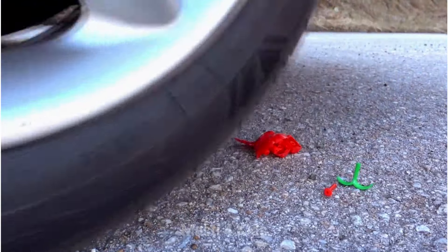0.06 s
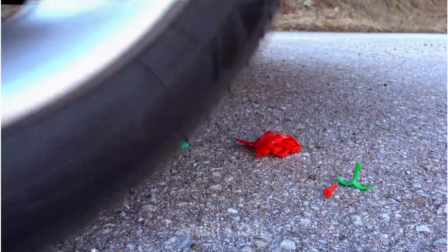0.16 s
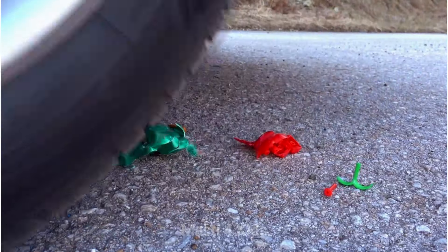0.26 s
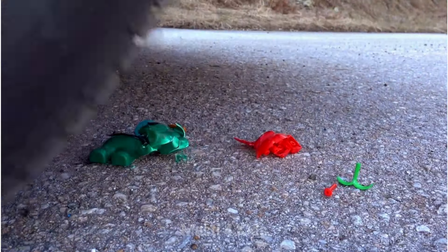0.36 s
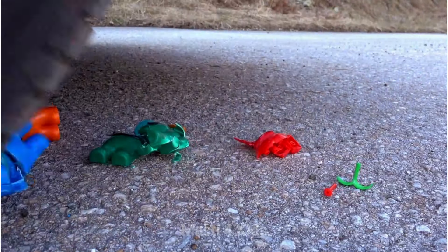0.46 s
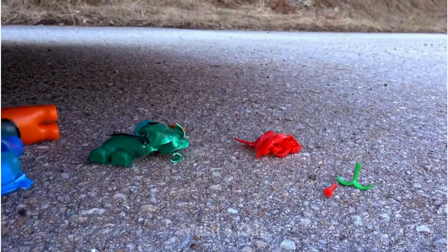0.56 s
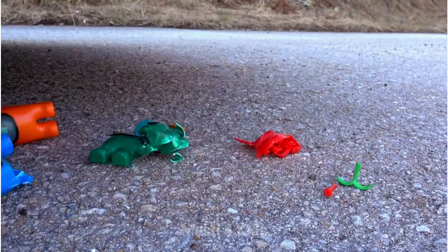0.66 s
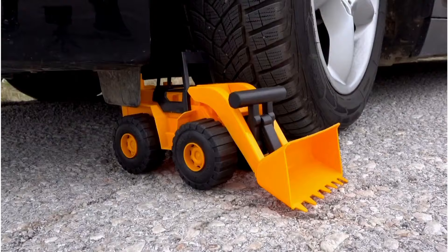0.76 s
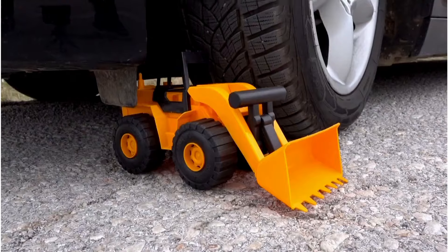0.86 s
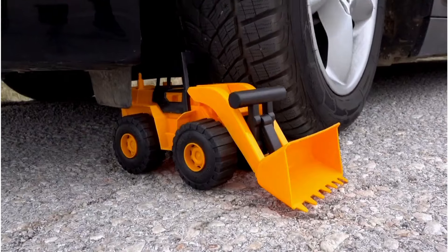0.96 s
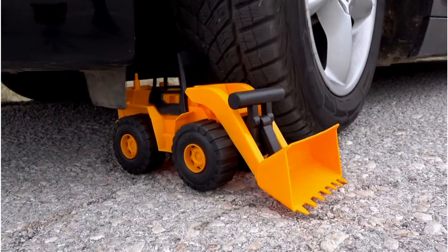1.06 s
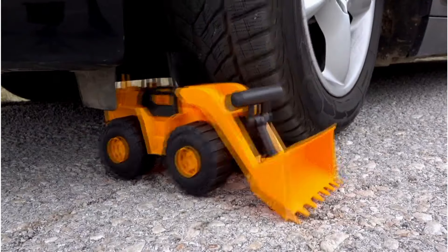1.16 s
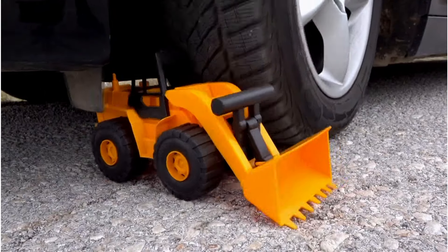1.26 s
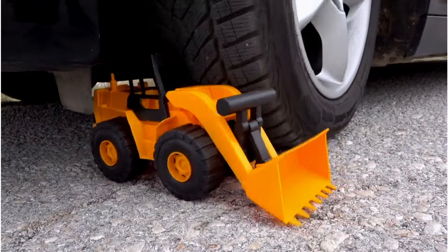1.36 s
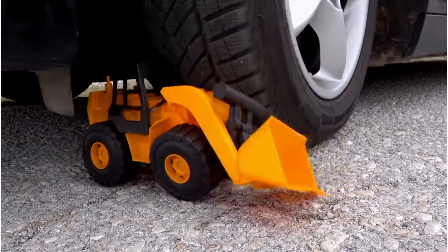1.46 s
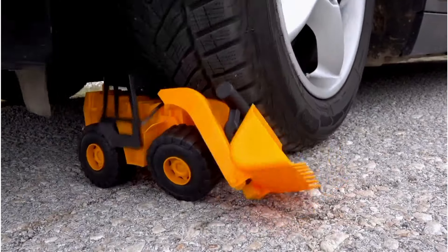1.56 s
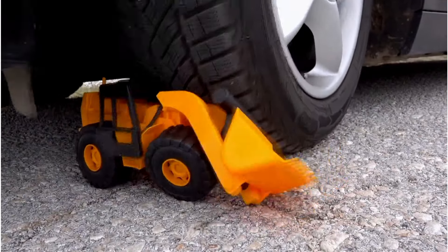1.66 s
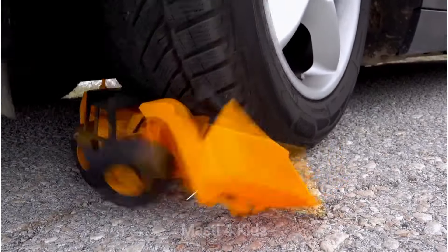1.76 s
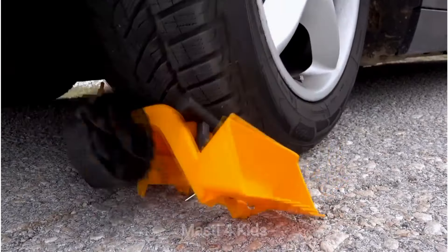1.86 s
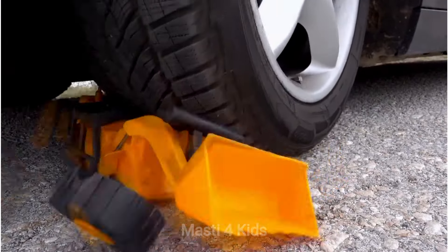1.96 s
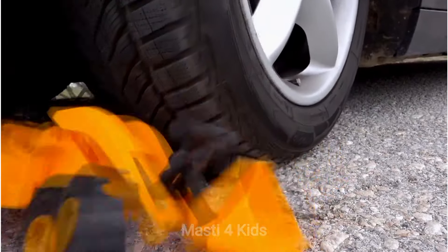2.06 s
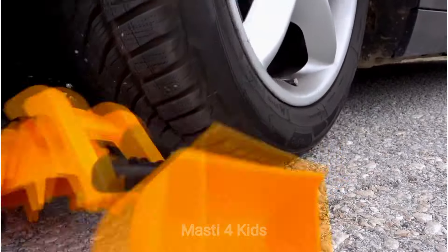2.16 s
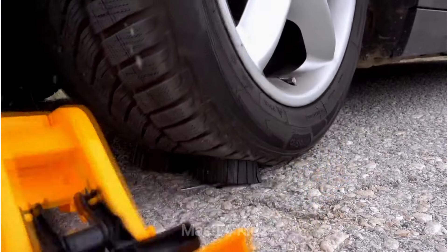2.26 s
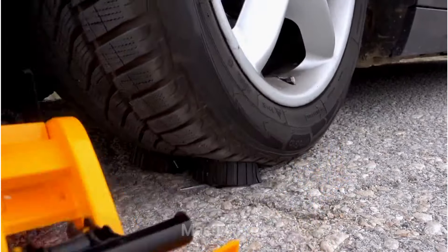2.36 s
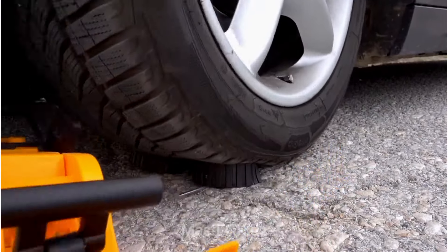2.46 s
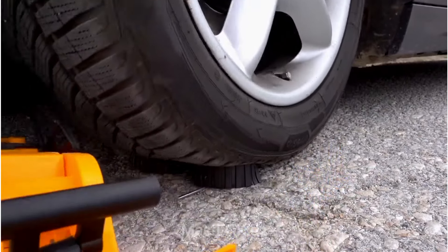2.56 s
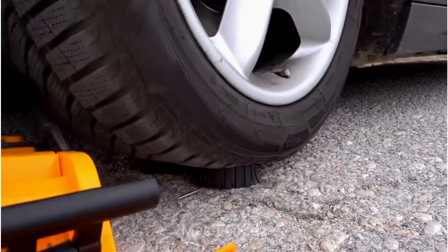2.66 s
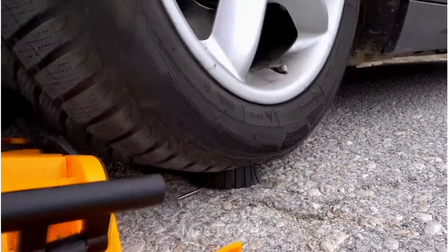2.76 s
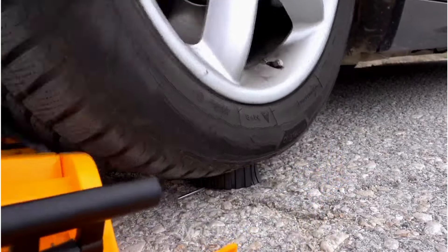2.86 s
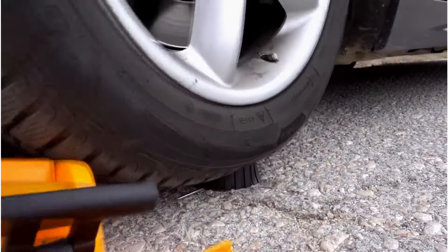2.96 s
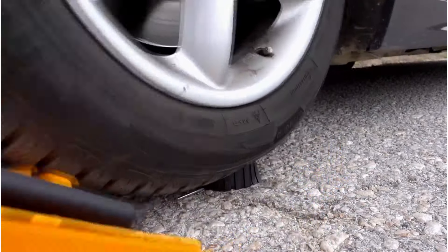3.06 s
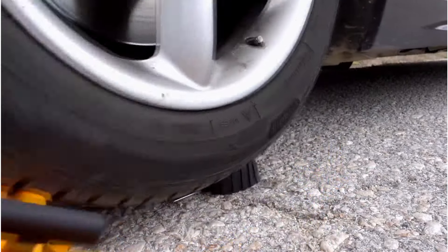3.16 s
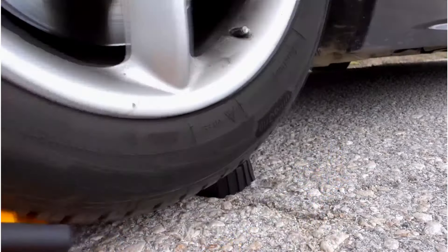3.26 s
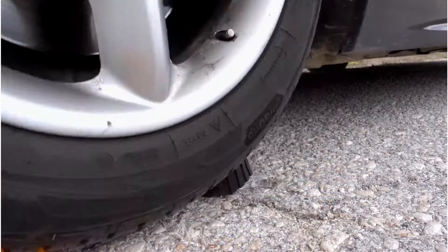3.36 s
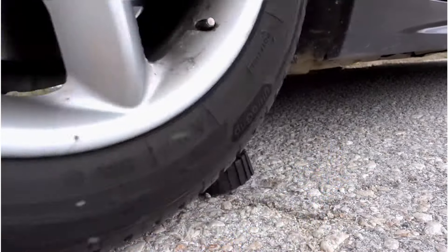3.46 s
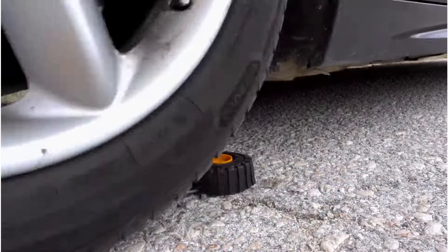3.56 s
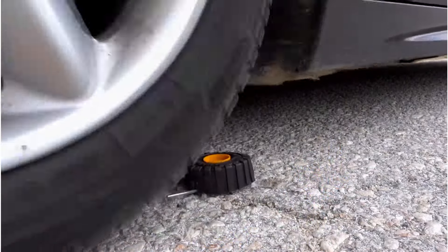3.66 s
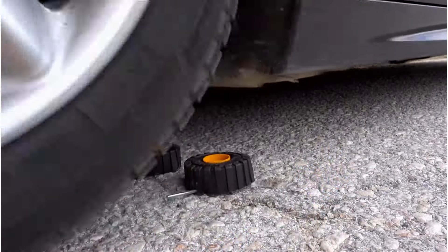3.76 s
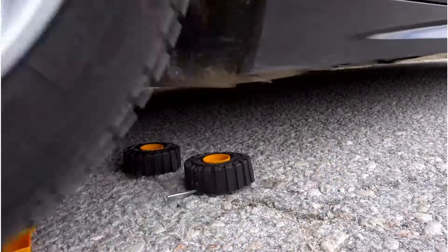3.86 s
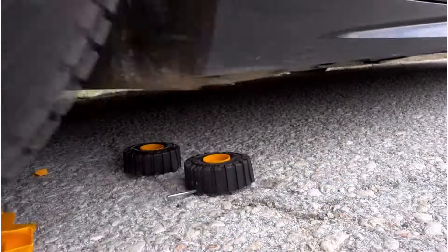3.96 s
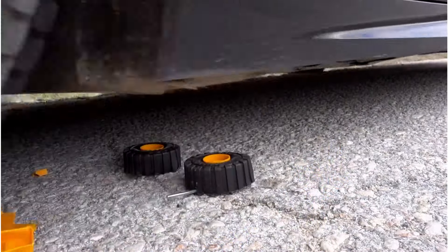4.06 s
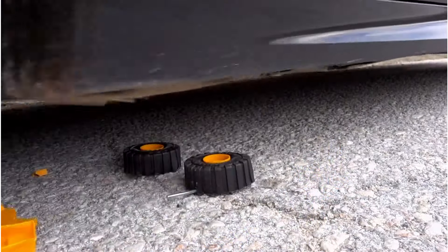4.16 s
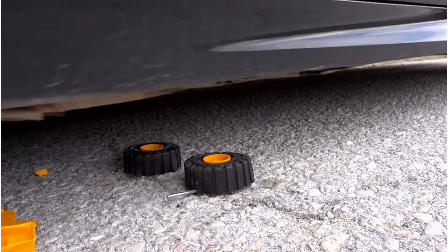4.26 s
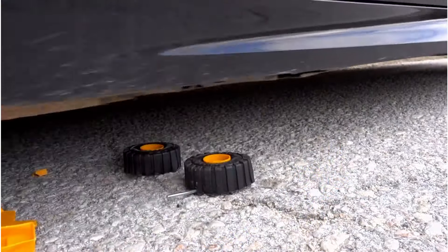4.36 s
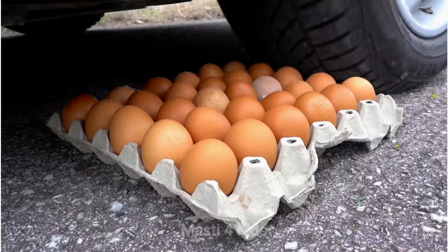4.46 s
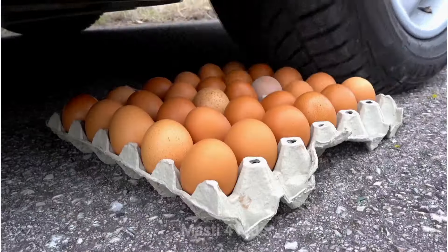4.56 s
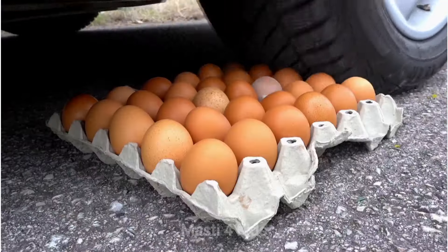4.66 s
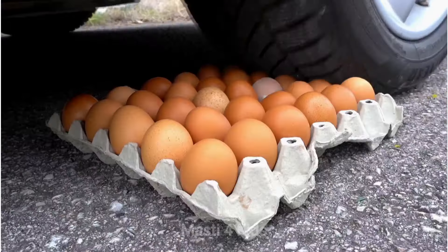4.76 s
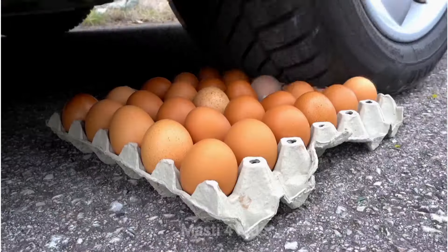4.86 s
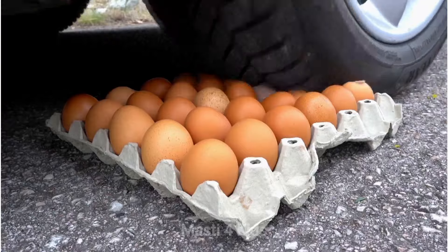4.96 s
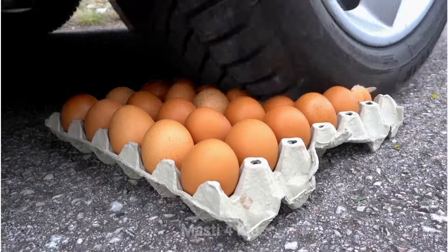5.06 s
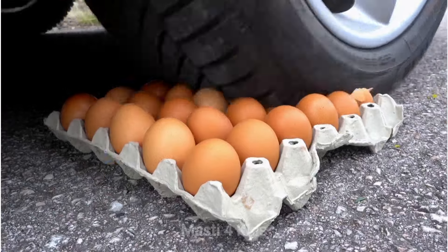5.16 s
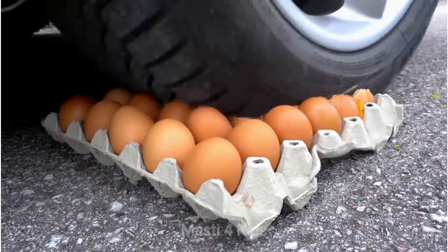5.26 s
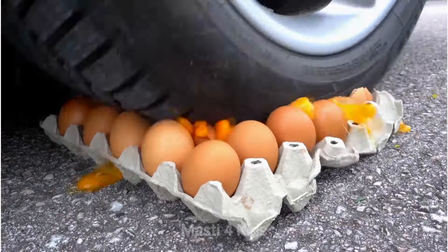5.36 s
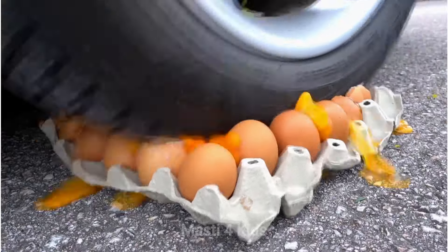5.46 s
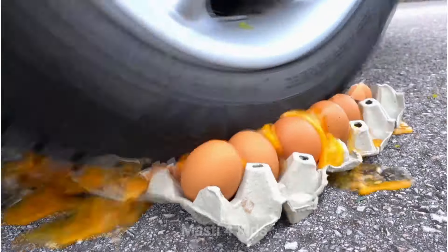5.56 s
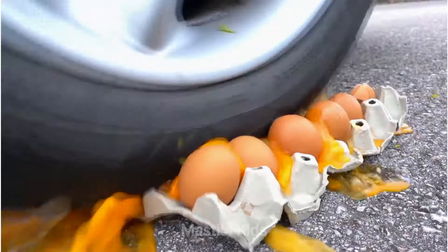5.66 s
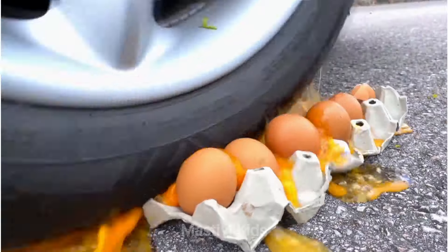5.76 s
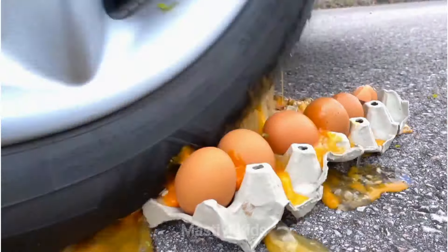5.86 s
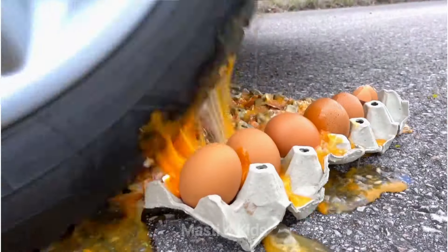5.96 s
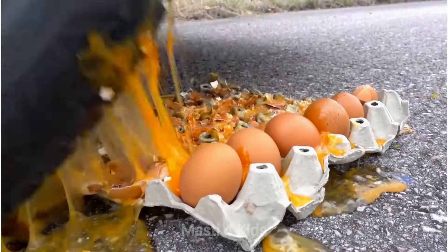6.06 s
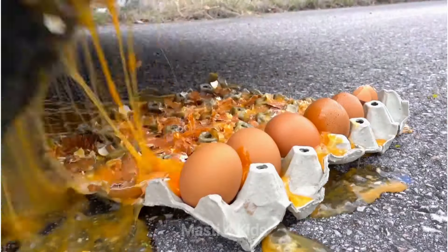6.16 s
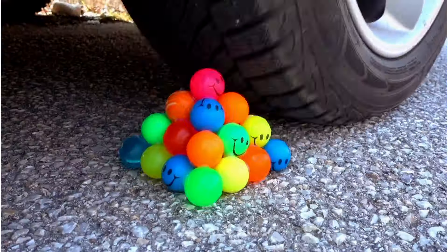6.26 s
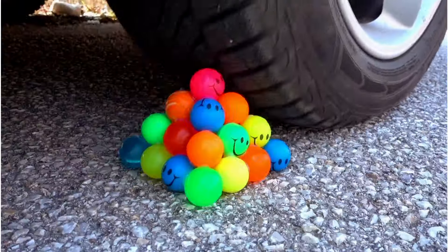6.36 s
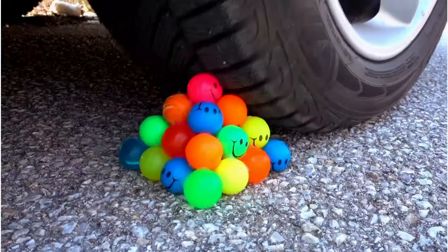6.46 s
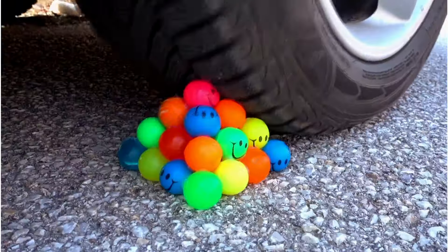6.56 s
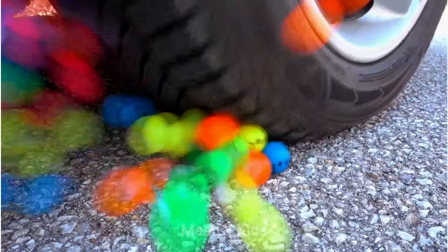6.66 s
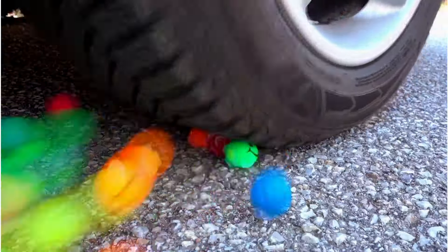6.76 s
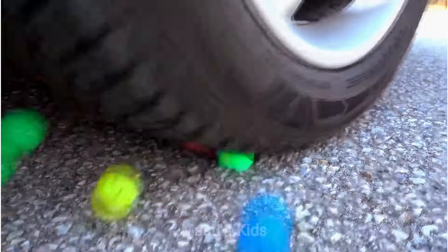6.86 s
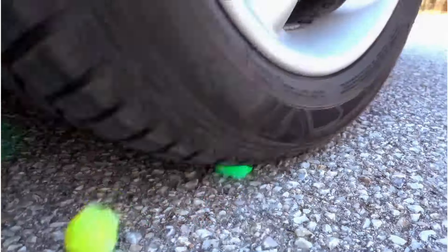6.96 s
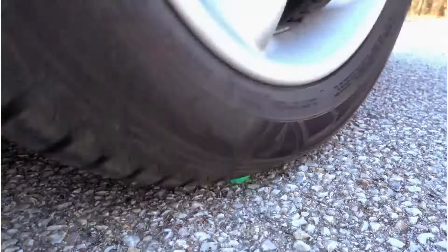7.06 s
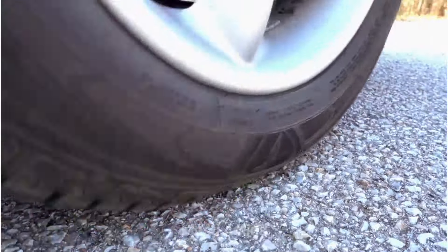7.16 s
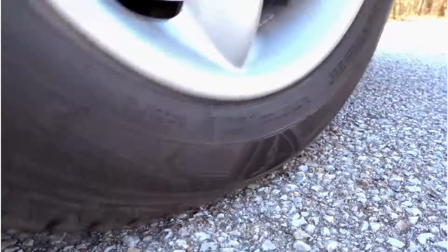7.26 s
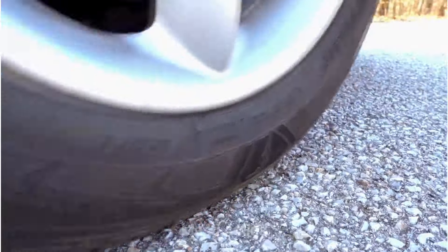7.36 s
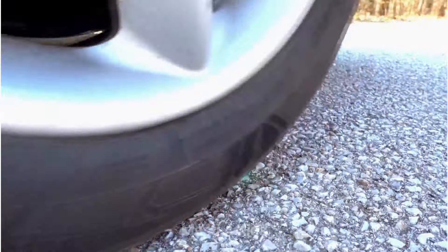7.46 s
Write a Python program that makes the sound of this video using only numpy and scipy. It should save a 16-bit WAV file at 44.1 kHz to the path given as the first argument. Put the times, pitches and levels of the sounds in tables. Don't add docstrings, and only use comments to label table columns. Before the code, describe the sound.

Outdoors on asphalt, stereo microphones sit very close beside a slowly rolling car tyre, dry, with faint deep air noise. At 0 s a short hollow creak and plastic crunch gives way to sharp ticks and small cracks, almost quiet by 0.9 s with a tiny clink. From 1.2 s a hard plastic toy scrapes and gives way; the loudest knock comes near 1.95 s with a low tyre thud, followed by dense snapping until 2.4 s. Between 2.45 and 3.0 s dull, rapid stick-slip creaks around a mid pitch dominate. Crunching and snapping return from 3.1 to 4.0 s over ground rumble and tyre hum. Sparse debris ticks lead into a lull until 4.85 s. Eggs crunch from 5.0 to 5.9 s with many short hollow pops and fine crackle, then drips and ticks. At 6.8-7.3 s, small balls thud, knock and crack, then it thins out.

```python
import sys
import numpy as np
from scipy import signal
from scipy.fft import rfft, irfft, next_fast_len
from scipy.io import wavfile
from scipy.ndimage import uniform_filter1d

SR = 44100
rng = np.random.default_rng(int(sys.argv[2]) if len(sys.argv) > 2 else 0)


def digitize_waveform(pressure):
    field = np.atleast_2d(pressure).T
    bounded = np.clip(field, -1, 1)
    quanta = np.round(bounded * 32767).astype(np.int16)
    wavfile.write(sys.argv[1], SR, quanta)


def level_to_linear(level):
    exponent = np.asarray(level, float) / 20
    return 10 ** exponent


N = 330750


def evened(x):
    return x / np.sqrt(np.mean(x ** 2) + 1e-20)


def read(points, hz):
    f, value = np.transpose(points)
    return np.interp(np.log(hz + 1), np.log(f + 1), value)


def curves(rows):
    s, *columns = np.transpose(rows)
    return [np.interp(np.arange(N) / SR, s, c) for c in columns]


def add(mix, s, sound):
    part = mix[max(round(s * SR), 0):][:len(sound)]
    part += sound[:len(part)]


def decay(t, t60):
    return level_to_linear(-60 * t / t60)


def onset(t, rise_s):
    return 1 - np.exp(-t / rise_s)


def sine(hz, t):
    return np.sin(2 * np.pi * hz * t)


def colour(x, gain):
    size = next_fast_len(len(x))
    return irfft(rfft(x, size) * gain(np.fft.rfftfreq(size, 1 / SR)), size)[:len(x)]


def ring(x, hz, width):
    r = np.exp(-np.pi * width / SR)
    return signal.lfilter([1 - r], [1, -2 * r * np.cos(2 * np.pi * hz / SR), r * r], x)


def clicks(per_s, spread_db):
    chance = rng.random(N)
    size = np.minimum(rng.exponential(1, N), 4)
    return level_to_linear(spread_db * size) * (chance < per_s / SR) * rng.choice([-1., 1.], N)


def clumps(per_s, spread_db, fade_s, rest):
    fade = np.exp(-1 / (fade_s * SR))
    bursts = signal.lfilter([1], [1, -fade], abs(clicks(per_s, spread_db)))
    return evened(rest + evened(bursts))


def patchy(x, depth_db):
    z = signal.stft(x, nperseg=384)[2]
    field = uniform_filter1d(rng.standard_normal(z.shape), size=2, axis=0)
    field = uniform_filter1d(field, size=3, axis=1)
    return evened(signal.istft(z * level_to_linear(depth_db * evened(field)), nperseg=384)[1][:N])


def swells(rows, rise_s, sag_db):
    out = np.zeros(N)
    for s, db, length in rows:
        u = np.arange(0, 2 * abs(length), 1 / SR)
        stop = min(abs(length) / 2, 0.12)
        ending = np.maximum(u - length + stop, 0) / stop
        add(out, s, level_to_linear(db - sag_db * u / length) * np.exp(-ending ** 2) * onset(u, rise_s))
    return out


# t/s, grinding level/dB, splinters above that/dB
LOAD = [(0, -40, -7), (.2, -62, 4), (.48, -69, -9), (.63, -64.5, 5.5), (.93, -67.5, -1.5), (1.2, -67, -7),
        (1.9, -40, -11), (2.8, -52.5, -28), (3.1, -42.5, -15.5), (3.9, -51.5, 0.5), (4.18, -50.5, -3.5),
        (4.85, -69, -8), (5.1, -35, -5.5), (5.78, -43.5, 3), (6.07, -50, -15), (6.72, -60.5, -5),
        (7.15, -64, -1), (7.5, -47, -10)]
# start t/s, grinding level/dB, length/s, splinters above that/dB
COLLAPSES = [(0, -43, 0.017, 10), (0.504, -54, 0.11, -2.5), (1.157, -49.5, 0.18, -15.5),
             (1.297, -32, 0.12, -20.5), (1.406, -40, 0.14, -36), (1.55, -33, 0.081, -14),
             (1.627, -43, 0.054, -14), (1.942, -34, 0.18, -22.5), (2.095, -32, 0.063, -12),
             (2.175, -32.5, 0.17, -8.5), (2.389, -39, 0.17, -14), (2.617, -37, 0.13, -38),
             (3.125, -40.5, 0.27, -13.5), (3.203, -39.5, 0.068, -1.5), (3.323, -29, 0.15, -12.5),
             (3.497, -33.5, 0.15, -12), (3.68, -34.5, 0.21, -10.5), (4.099, -50, 0.038, -8),
             (4.54, -66, 0.17, -43.5), (4.865, -51.5, 0.19, -6), (5.017, -33, 0.058, -9),
             (5.445, -35, 0.35, -5.5), (5.858, -40, 0.19, -10), (6.217, -54, 0.2, -14),
             (6.513, -46, 0.14, -38), (6.779, -46.5, 0.22, -3.5), (7.012, -38.5, 0.061, -21),
             (7.194, -42, 0.17, -6.5)]
GIVE_S, GIVE_SAG_DB = 0.0085, 2


def pressure():
    level_db, brittle_db = curves(LOAD)
    grinds = [(s, db, length) for s, db, length, up_db in COLLAPSES]
    splinters = [(s, db + up_db, length) for s, db, length, up_db in COLLAPSES]
    grind = np.hypot(level_to_linear(level_db), swells(grinds, GIVE_S, GIVE_SAG_DB))
    brittle = np.hypot(level_to_linear(level_db + brittle_db), swells(splinters, GIVE_S, GIVE_SAG_DB))
    return grind, brittle


# start t/s, level/dB, length/s
SQUASH = [
    (5.03, 0, .85),
]


def eggs_underfoot():
    return swells(SQUASH, GIVE_S, 0)


# f/Hz, density/dB
AIR = [(18, -35), (30, 11), (90, 1), (13900, -52), (15800, -50)]


def outdoor_air():
    return level_to_linear(-71.5) * evened(colour(rng.standard_normal(N), lambda hz: level_to_linear(read(AIR, hz))))


# start t/s, level/dB, length/s
RUMBLE = [(0, -49, 0.43), (.9, -43.5, 0.2), (1.25, -46, 0.66), (3.3, -40.5, 0.44), (3.68, -33.5, 0.19),
          (4.65, -44.5, 0.39), (4.95, -42, 1.59), (6.79, -43, 0.34)]


def ground_rumble():
    rumble = evened(ring(ring(rng.standard_normal(N), 119.0, 34), 62, 72))
    return (level_to_linear(-104) + swells(RUMBLE, 0.013, -1.5)) * level_to_linear(-11.0) * rumble


RING_HZ = 204.2
# start t/s, level/dB, length/s
TYRE = [(0, -50, 0.1), (1.55, -48.5, 0.23), (1.98, -37, 0.096), (2.2, -44, 0.15), (2.7, -51, 0.24),
        (3.32, -47, 0.7), (3.8, -49.5, 0.39), (4.05, -61, 0.29), (5.02, -39, 0.071), (5.17, -39.5, 0.21),
        (5.4, -46.5, 0.35), (6.82, -37.5, 0.16), (7.13, -52.5, 0.28)]
# start t/s, level/dB, length/s
OVERTONES = [(3.3, -57, 0.27), (3.79, -49.5, 0.2), (4.09, -56, 0.086)]


def air_ring():
    shake = rng.standard_normal((2, N))
    free = evened(ring(shake[0], RING_HZ, 4.5))
    rough = evened(ring(ring(shake[1], 235, 80), 194, 81))
    damped = np.clip((20 * np.log10(pressure()[0]) + 54) / 14, .15, .9)
    hum = (1 - damped) * free + damped * rough
    upper = sum(evened(ring(shake[0], k * RING_HZ, 7.0)) for k in (2, 2.92))
    return (level_to_linear(-74.5) + swells(TYRE, 0.013, 1)) * hum + swells(OVERTONES, 0.013, 3.7) * upper


# t/s, peak level/dB, f/Hz
THUMPS = [(1.577, -36.5, 452), (2.016, -22.5, 199), (2.037, -25, 221), (2.236, -39, 214), (3.805, -39, 204),
          (3.812, -30.5, 114), (3.852, -39, 131), (5.063, -30, 172), (6.854, -26, 253), (6.901, -30, 172.5),
          (7.09, -35.5, 191), (7.136, -27.5, 212.3)]


def thumps():
    out, t = np.zeros(N), np.arange(9000) / SR
    for s, db, hz in THUMPS:
        thud = decay(t, 0.13) * sine(hz, t + 0.002 * onset(t, 0.0018))
        upper_body = 0.26 * decay(t, 0.12) * sine(1.91 * hz, t)
        thud = (thud + upper_body) * onset(t, 0.00088)
        add(out, s, level_to_linear(db + 0.5) * (thud + 0.45 * decay(t, 0.081) * sine(RING_HZ, t)))
    return out


# t/s, peak level/dB, f/Hz
TICKS = [(0.181, -18.5, 3330), (0.546, -27, 860), (.709, -39, 4350), (0.754, -27.5, 2400),
         (.867, -37, 2130), (1.25, -18, 2060), (4.237, -35, 1510), (4.245, -36, 1400), (4.303, -21, 2210),
         (4.385, -28, 1700), (4.546, -32.5, 1110), (4.715, -32.5, 1040), (6.062, -31, 2070),
         (6.24, -31.5, 1110), (6.34, -39, 874), (6.522, -29.5, 2720), (6.582, -28.5, 1200),
         (6.608, -27.5, 1120), (6.658, -29, 1900), (7.383, -50, 1000)]


def debris():
    out, t = np.zeros(N), np.arange(1500) / SR
    for s, db, hz in TICKS:
        hit = rng.standard_normal(len(t)) * decay(t, 0.03) + 6.0 * (t == 0)
        sound = evened(ring(hit, hz, 63)) + 0.73 * evened(ring(hit, 2850, 1040)) + 0.095 * evened(hit)
        add(out, s, level_to_linear(db - 12.0) * sound / abs(sound).max())
    return out


# t/s, peak level/dB, f/Hz
CHIPS = [(0.547, -28.5, 890), (1.884, -17, 1830), (3.87, -22.5, 714), (4.236, -33, 1950),
         (4.246, -33.5, 875), (4.383, -29, 1600), (5.893, -21.5, 940), (5.923, -24, 840), (5.933, -22, 890),
         (5.957, -20, 982), (6.523, -34, 765), (6.609, -34, 756), (6.661, -37, 1860), (7.095, -32.5, 1620)]


def chips():
    out, t = np.zeros(N), np.arange(400) / SR
    for s, db, hz in CHIPS:
        u = t * hz / 0.25
        add(out, s, level_to_linear(db - 2.5) * u * np.exp(1 - u) * sine(hz, t))
    return out


# t/s, peak level/dB
SPARKS = [(.851, -50), (3.658, -31), (4.326, -38), (5.255, -44), (5.409, -33), (5.446, -38), (5.66, -46),
          (6.825, -28.5), (6.934, -35), (7.183, -49), (7.247, -29)]


def sparks():
    out, t = np.zeros(N), np.arange(500) / SR
    for s, db in SPARKS:
        add(out, s, level_to_linear(db - 1.5) * rng.standard_normal(len(t)) * decay(t, 0.028))
    small = signal.oaconvolve(abs(clicks(150, 5.2)), decay(t, 0.0035))[:N] * rng.standard_normal(N)
    crackle = level_to_linear(-14.0) * pressure()[1] * eggs_underfoot() * evened(small)
    return colour(out + crackle, lambda hz: np.clip(hz / 3000, 0, 1))


# t/s, peak level/dB, f/Hz
POPS = [(5.019, -33, 690), (5.173, -20.5, 685), (5.185, -29, 937), (5.192, -30, 1020), (5.206, -34, 710),
        (5.22, -24, 355), (5.229, -29, 805), (5.269, -31, 1360), (5.303, -28, 705), (5.315, -24.5, 565),
        (5.327, -23.5, 730), (5.357, -24, 345), (5.372, -25, 810), (5.397, -32, 610), (5.412, -28, 820),
        (5.425, -24, 640), (5.436, -29, 604), (5.445, -25, 760), (5.461, -25, 570), (5.478, -23, 650),
        (5.491, -27, 840), (5.559, -38, 1120), (5.572, -21, 810), (5.591, -32, 865), (5.634, -26.5, 420),
        (5.649, -34.5, 890), (5.696, -30, 867), (5.707, -34, 726), (5.718, -36, 1310), (5.74, -35, 1100),
        (5.763, -32, 870), (5.809, -30, 935), (6.008, -36, 985)]


def eggs():
    out, t = np.zeros(N), np.arange(900) / SR
    u = t / 0.0029
    swell = u * np.exp(1 - u - (u / 1.73) ** 2)
    for s, db, hz in POPS:
        add(out, s, level_to_linear(db - 2.5) * swell * sine(hz, t))
    return out


# t/s, peak level/dB
FRACTURES = [(0.009, -35), (0.154, -24), (0.235, -37), (0.36, -45), (0.589, -33), (1.3377, -33),
             (1.4235, -42), (1.439, -34), (1.6337, -39), (1.6636, -24), (1.861, -34), (1.8815, -30),
             (1.8933, -23), (2, -26), (2.1313, -25), (2.426, -42), (2.4503, -27), (2.6075, -39),
             (2.627, -40), (3.1923, -27), (3.362, -29), (3.4441, -22), (3.484, -36), (3.837, -26),
             (3.8705, -29), (3.951, -33), (3.9668, -24.5), (4.119, -38), (4.1945, -49), (4.226, -46),
             (4.341, -31), (4.364, -30.5), (4.4368, -50), (4.4637, -44), (5.06, -34), (5.0838, -38),
             (5.2018, -29), (5.3385, -28), (5.3647, -24), (5.3883, -32), (5.4948, -36), (5.6977, -38),
             (5.888, -36), (5.9229, -45), (5.931, -31), (6.226, -41), (6.3765, -47), (6.8164, -29),
             (6.8736, -31), (7.0239, -24.5), (7.052, -30), (7.209, -31), (7.29, -35)]


def fractures():
    out, t = np.zeros(N), np.arange(1500) / SR
    for s, db in FRACTURES:
        spray = rng.standard_normal(len(t)) * decay(t, 0.038) * onset(t, 0.00048)
        click = np.diff(spray, prepend=0)
        add(out, s, level_to_linear(db - 9.5) * (click * 0.42 + 1.78 * ring(spray, 4500, 3900)))
    return out


# t/s, peak level/dB
CLINKS = [(0.755, -45), (0.868, -55), (0.952, -45)]
# f/Hz, level/dB, t60/s
CLINK_MODES = [(870, -24, 0.11), (1480, -14.5, 0.2), (2130, -9, 0.11), (2400, -17, 0.071)]


def clinks():
    out, t = np.zeros(N), np.arange(6000) / SR
    for s, db in CLINKS:
        for hz, up_db, t60 in CLINK_MODES:
            add(out, s, level_to_linear(db + up_db) * decay(t, t60) * sine(hz, t))
    return out


# t/s, peak level/dB, f/Hz
SLIPS = [(.001, -22, 676), (.011, -29, 706), (.022, -21.5, 710), (.03, -21.5, 706), (.059, -31, 834),
         (2.468, -27, 1020), (2.49, -21, 1020), (2.517, -32, 654), (2.523, -26, 990), (2.533, -21.5, 995),
         (2.539, -22, 1003), (2.55, -24, 1030), (2.569, -27, 1050), (2.66, -19, 1047), (2.666, -19.5, 655),
         (2.677, -19, 824), (2.709, -20.5, 640), (2.717, -26, 920), (2.726, -19.5, 915), (2.783, -27, 990),
         (2.843, -29.5, 870), (2.85, -25, 1010), (2.857, -21, 977), (2.879, -29, 1000), (2.893, -25.5, 960),
         (2.907, -23, 990), (2.918, -30, 950), (2.946, -23, 930), (2.97, -22.5, 977), (2.986, -29, 1000)]
# t/s, peak level/dB, f/Hz
JERKS = [(2.645, -23.5, 1130), (2.65, -24, 1040), (2.755, -19, 986), (2.795, -20.5, 1015),
         (2.803, -24, 1060), (2.995, -29, 1030), (3.012, -24.5, 1054), (3.023, -29.5, 797)]
# start t/s (earlier times play from 0), peak level/dB,
# f/Hz, t60/s
PING = (-3.7, -37, 842, 0.48)


def creak():
    out, t = np.zeros(N), np.arange(2200) / SR
    for s, db, hz, up_db in [(*row, -18) for row in SLIPS] + [(*row, 11.5) for row in JERKS]:
        noise = rng.standard_normal(len(t))
        tone = sine(hz, t) + level_to_linear(up_db - 20.5) * sine(2080 * (1 + 0.029 * noise[0]), t)
        tone += .5 * decay(t, 0.019) * sine(0.9 * hz, t)
        tone += 0.056 * decay(t, 0.034) * sine(3.1 * hz, t)
        tone *= 1 + 0.83 * uniform_filter1d(noise, size=40)
        tone += 0.12 * ring(ring(noise, 1300, 2600), 3300, 1600) * decay(t, 0.041)
        add(out, s, level_to_linear(db - 3.0) * decay(t, 0.035) * onset(t, 0.00056) * tone)
    s, db, hz, t60 = PING
    t = np.arange(12000) / SR
    add(out, s, level_to_linear(db) * decay(t, t60) * onset(t, 0.0061) * sine(hz, t))
    return colour(out, lambda hz: 1 / np.sqrt(1 + (hz / 7500) ** 6))


# t/s, peak level/dB, f/Hz, length of the run of jolts/s
BLOWS = [(1.344, -17, 980, 0.048), (1.408, -15.5, 1476, 0.041), (2.309, -19, 1140, 0.049),
         (2.499, -24.5, 1010, 0.049), (3.326, -27, 1150, 0.078), (1.294, -27.5, 620, 0.019),
         (0.238, -25.5, 700, 0.016), (0.955, -43, 2100, 0.0046), (1.237, -31, 1480, 0.03),
          (1.482, -29, 1410, 0.011), (1.578, -20, 1330, 0.022), (1.66, -24, 2120, 0.013),
          (1.746, -22, 1390, 0.013), (1.778, -19, 584, 0.021), (1.884, -20.5, 1730, 0.038),
          (1.944, -10, 1650, 0.017), (2.014, -23, 556, 0.045), (2.106, -23, 1250, 0.028),
          (2.183, -18.5, 1200, 0.03), (2.378, -21.5, 1740, 0.021), (3.268, -17.5, 905, 0.023),
          (3.394, -21.5, 730, 0.029), (3.453, -22, 570, 0.018), (3.629, -21.5, 1760, 0.034),
          (3.669, -17, 755, 0.02), (3.866, -24.5, 675, 0.017), (3.963, -26.5, 1110, 0.019),
          (5.022, -24.5, 705, 0.0073), (5.178, -22.5, 704, 0.04), (5.569, -20.5, 864, 0.047),
          (6.797, -23, 470, 0.033), (6.847, -20, 497, 0.05), (6.896, -22, 444, 0.017),
          (7.204, -22, 402, 0.015), (7.286, -22.5, 910, 0.012),
         (1.03, -51.5, 350, 0.074), (1.12, -45, 300, 0.029), (1.213, -35.5, 450, 0.022),
         (1.216, -45, 1480, 0.007), (1.27, -34, 1480, 0.0082), (1.362, -25, 910, 0.025),
         (2.506, -21.5, 610, 0.051), (2.686, -26.5, 1050, 0.014), (2.822, -36, 1000, 0.0049),
         (2.858, -33, 2120, 0.0083), (2.885, -43, 2330, .012), (2.938, -32.5, 2190, 0.01),
         (3.008, -29.5, 2900, .012), (3.032, -24.5, 2350, 0.0084), (3.185, -27.5, 1150, 0.032),
         (3.35, -29, 1000, 0.018), (3.375, -29, 800, 0.0081), (3.484, -21.5, 530, 0.031),
         (3.55, -21, 696, 0.018), (3.933, -32, 1100, 0.011), (4.062, -38, 1650, 0.0084),
         (4.34, -41, 650, 0.01), (4.66, -50, 448, 0.081), (4.71, -45, 337, 0.042),
         (5.85, -28, 2400, 0.0047), (6.0, -39, 1070, 0.034), (6.055, -30.5, 2140, 0.063),
         (6.245, -38, 2400, 0.0077), (6.345, -37.5, 840, 0.012), (6.58, -44, 935, 0.019),
         (6.953, -26, 523, 0.021), (7.258, -25.5, 331, 0.0073)]
# t/s, peak level/dB, f/Hz
TAPS = [(4.091, -23, 690), (5.891, -26, 915), (5.922, -30, 840), (5.933, -30, 890), (5.956, -26, 1060),
        (5.975, -22, 1120), (7.314, -21.5, 660)]


def knocks():
    out, t = np.zeros(N), np.arange(4400) / SR
    for s, db, hz, length in BLOWS + [(*row, 0.0068) for row in TAPS]:
        chance, size = rng.random((2, len(t)))
        run_s = np.clip(length, .002, .07)
        jolts = (chance < .05) * (size - .5) * np.exp(-(t / run_s) ** 4) + 0.28 * (t == 0)
        body = ring(jolts, hz, 40 + 0.098 * hz + .5 / run_s)
        tick = ring(jolts, 1.58 * hz, 950)
        tick_share = 0.21 + 0.00042 / length
        add(out, s, level_to_linear(db - 6.0) * (body / abs(body).max() + tick_share * tick / abs(tick).max()))
    return out


# t/s, peak level/dB, length of the shower of splinters/s
CRACKS = [(2.181, -27, 0.096), (3.4815, -29, 0.14), (4.719, -59, 0.032), (4.9582, -36, 0.27),
          (5.081, -31, 0.083), (0.14, -37, 0.085), (1.571, -22, 0.027), (1.657, -27, 0.055),
          (1.88, -38, 0.065), (1.941, -26, 0.075), (2.077, -27, 0.038), (2.369, -23, 0.012),
          (3.154, -33, 0.045), (3.391, -25.5, 0.057), (3.67, -22.5, 0.055), (5.431, -31.5, 0.039),
          (6.7964, -30.5, 0.035), (6.89, -35, 0.066), (7.0212, -34, 0.065), (7.2, -30.5, 0.023),
          (7.24, -37, 0.021)]
# t/s, peak level/dB
SNAPS = [(0.096, -37.5), (0.181, -36), (0.533, -36), (0.744, -45), (1.171, -38.5), (1.32, -36),
         (1.779, -25.5), (1.804, -27), (2.137, -28.5), (2.481, -32), (2.564, -38.5), (2.75, -42),
         (3.058, -27.5), (3.2245, -28), (3.509, -28.5), (3.622, -31.5), (3.7699, -19.5), (3.8703, -24),
         (4.0144, -40.5), (5.828, -27.5), (7.095, -33)]
# f/Hz, density/dB
SNAP = [(200, -4.5), (700, -1), (1800, 2.5), (4000, 0.5), (8000, -8), (15000, -9.5), (17000, -43)]


def cracks():
    shower, t = np.zeros(N), np.arange(12000) / SR
    for s, db, length in CRACKS + [(*row, 0.022) for row in SNAPS]:
        torn = t / np.clip(length, .004, .2)
        add(shower, s, level_to_linear(db - 10.2 * torn) * np.exp(-torn ** 4) * onset(t, 0.0018))
    grit = evened(clicks(7000, 0.24)) + 0.98 * rng.standard_normal(N)
    return level_to_linear(-7.0) * shower * patchy(colour(grit, lambda hz: level_to_linear(read(SNAP, hz))), 3.95)


# f/Hz, density/dB
GRIND = [(120, -31), (200, -19), (339, -2.5), (700, -0.5), (1370, -3), (1530, -1.5), (6000, -22.5),
         (7800, -50)]
# f/Hz, density/dB
BRITTLE = [(880, -20), (1500, 16.5), (2320, 9.5), (3300, 0), (4530, -13), (13800, -16.5), (15200, 7),
           (15800, -52)]
# t/s, centre f/Hz
HOLLOW = [(0, 710), (1.4, 900), (3.2, 1150), (3.6, 574), (5.0, 1330), (5.4, 945), (7.5, 740)]


def crush():
    grind, brittle = pressure()
    hollow_hz = curves(HOLLOW)[0]
    burst = clumps(110, 0.93, 0.025, 0.23)
    flurry = clumps(150, 2.6, 0.013, 0.56)
    light = np.clip(-(20 * np.log10(grind) + 48) / 10, 0, 1)
    burst = burst * (1 - light + light * clumps(50, 1.4, 0.042, 1.0))
    burst = burst ** (1 - 0.66 * eggs_underfoot())
    breaks, part, body = clicks(2800, 3.2), rng.integers(0, 22, N), np.zeros(N)
    for k, hz in enumerate(np.geomspace(230, 5200, 22)):
        near = 1 + np.exp(-(np.log(hz / hollow_hz) / 0.61) ** 2)
        mode = evened(ring(breaks * (part == k), hz, 60 + 0.14 * hz))
        body += level_to_linear(read(GRIND, hz)) * np.sqrt(hz) * near * mode
    body /= np.sqrt(uniform_filter1d(body ** 2, 6000))
    fizz = evened(clicks(9000, 3.7)) + 0.45 * rng.standard_normal(N)
    fizz = colour(fizz, lambda hz: level_to_linear(read(BRITTLE, hz)) * np.clip(hz / 4000, 0, 1) ** 3)
    splinters = burst ** 1.02 * flurry ** 0.16 * brittle * level_to_linear(3.0) * patchy(fizz, 2.9)
    return burst * grind * level_to_linear(-3.5) * body + splinters


# t/s, level/dB
LULLS = [(.09, -5), (.135, -4.5), (.27, -4), (1.562, -14), (1.768, -5.5), (1.85, -3), (2.171, -4),
         (2.692, -23), (2.743, -10), (3.216, -3.5), (3.29, -5), (4.168, -11.5), (3.857, 0.5), (3.053, -6.5),
         (5.01, -5.5)]


def lulls():
    t = np.arange(N) / SR
    return level_to_linear(sum(db * np.exp(-((t - s) / 0.01) ** 4) for s, db in LULLS))


# f/Hz, side minus mid level/dB
SPREAD = [(60, -16), (180, -12.5), (550, -7), (1650, -6), (4970, -1), (15000, 2)]
# f/Hz, share of mid that leans left
LEAN = [(100, 0), (500, 0.13), (1500, 0.69), (4000, 0.73), (9000, 0.39), (15000, 0.0)]
# t/s, left minus right level in the middle band/dB
SIDEWAYS = [(0, 1), (.9, 3.5), (1.05, 0), (4.3, 3), (4.7, 0.65), (7.5, 1.8)]


def microphones(x):
    t, side = np.arange(700) / SR, np.zeros(N)
    place = rng.integers(0, 8, N // 800 + 1).repeat(800)[:N]
    for k in range(8):
        scatter = rng.standard_normal(len(t)) * decay(t, 0.026)
        share = np.sqrt(abs(uniform_filter1d(1. * (place == k), 300)))
        side += signal.oaconvolve(x * share, scatter / np.linalg.norm(scatter))[:N]
    side = colour(side, lambda hz: level_to_linear(read(SPREAD, hz) - 1.5))
    side += np.clip(curves(SIDEWAYS)[0] / 3, -1, 3) * colour(x, lambda hz: read(LEAN, hz))
    return np.array([x + side, x - side])


def scene():
    wheel = ground_rumble() + air_ring() + thumps()
    pieces = debris() + chips() + sparks() + eggs() + fractures() + clinks()
    hollow_parts = creak() + knocks()
    breaking = lulls() * (crush() + cracks())
    return microphones(outdoor_air() + wheel + pieces + hollow_parts + breaking)


def band_limit(x):
    return signal.sosfilt(signal.butter(12, 15400, fs=SR, output="sos"), x)


def record(dry):
    def band(hz):
        return 1 / np.sqrt((1 + (74.5 / (hz + 1)) ** 4) * (1 + (hz / 13880) ** 70))
    ports = np.array([colour(port, band) for port in dry])
    return band_limit(0.27 * np.tanh(ports / 0.25))


dry = scene()
out = record(dry)
digitize_waveform(out)
```